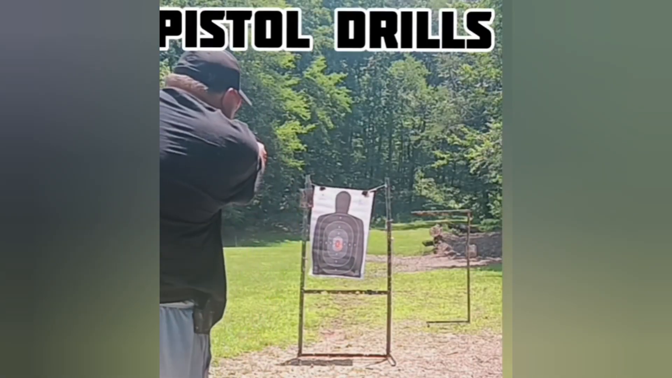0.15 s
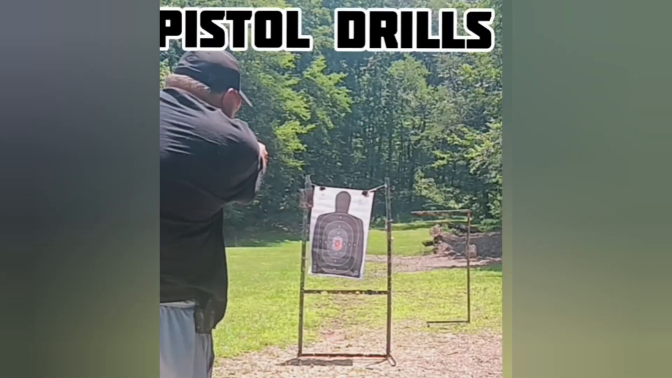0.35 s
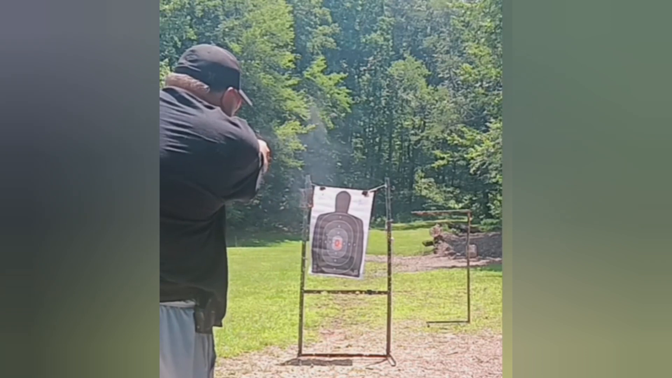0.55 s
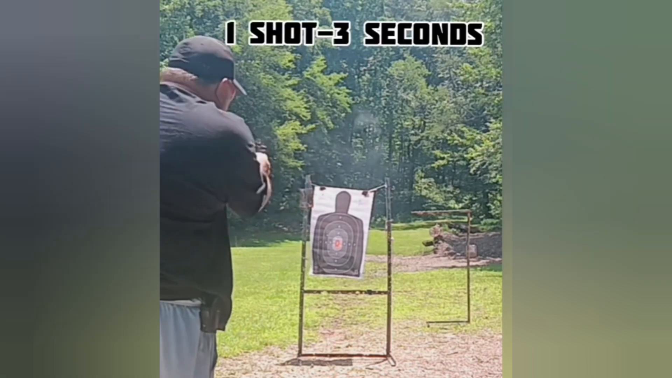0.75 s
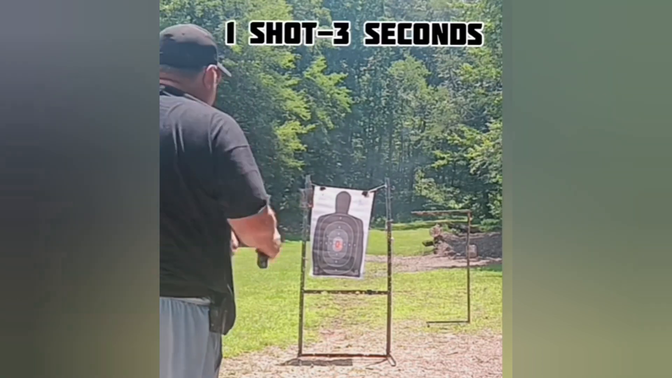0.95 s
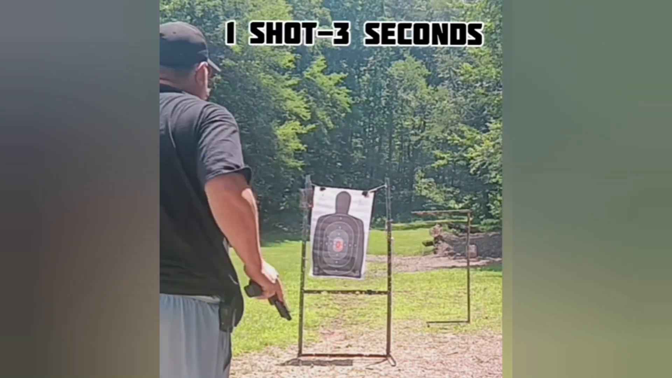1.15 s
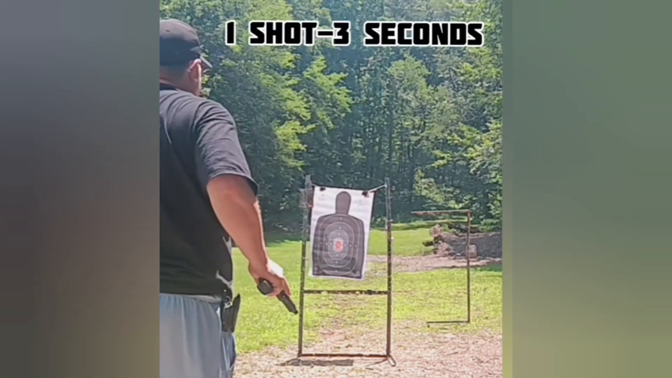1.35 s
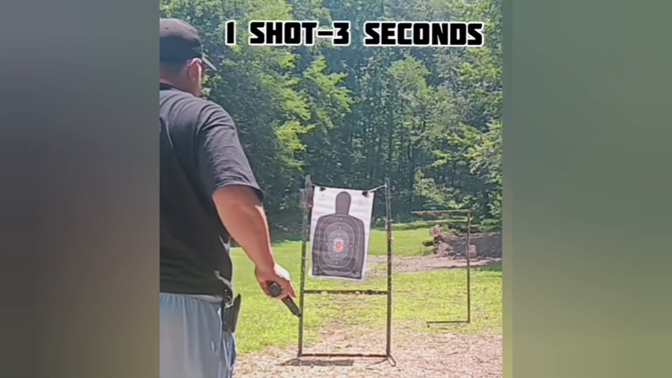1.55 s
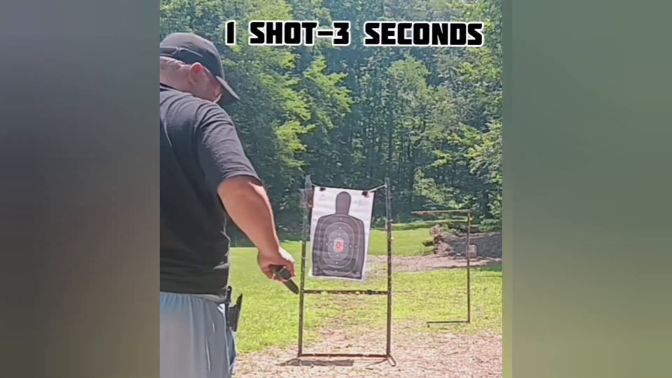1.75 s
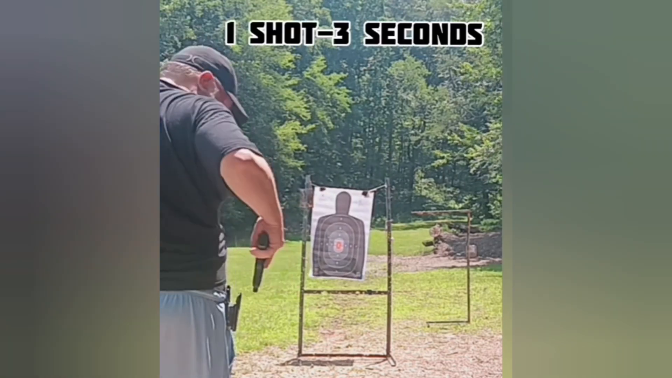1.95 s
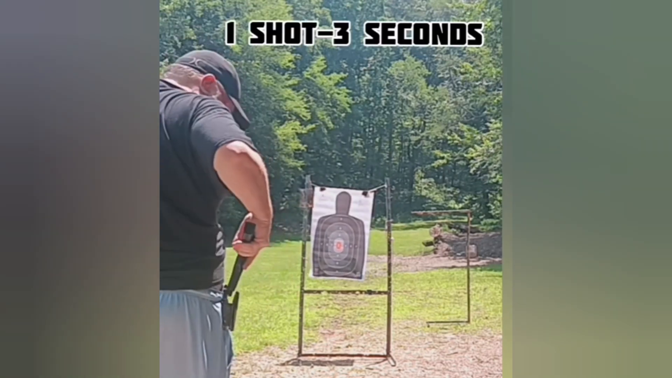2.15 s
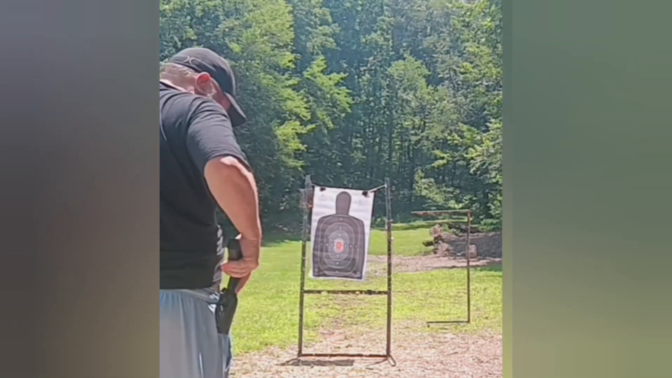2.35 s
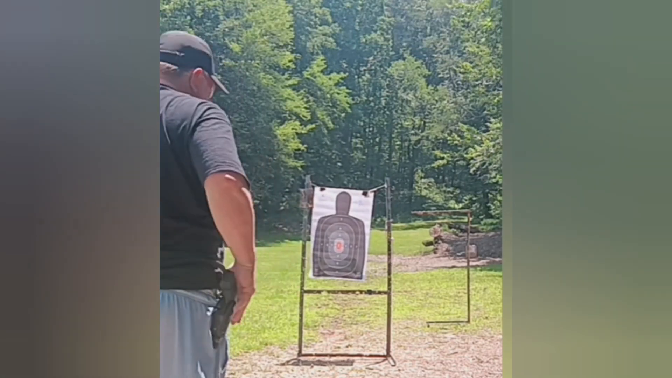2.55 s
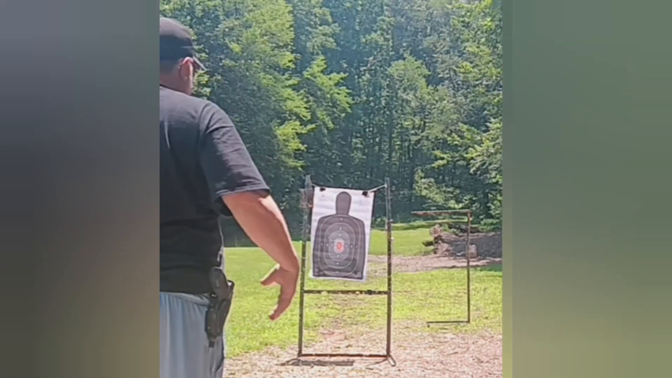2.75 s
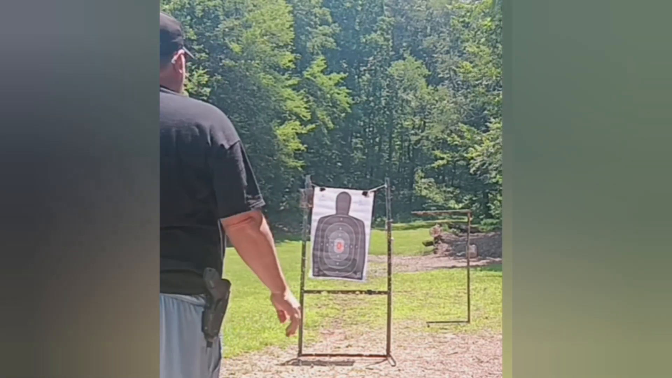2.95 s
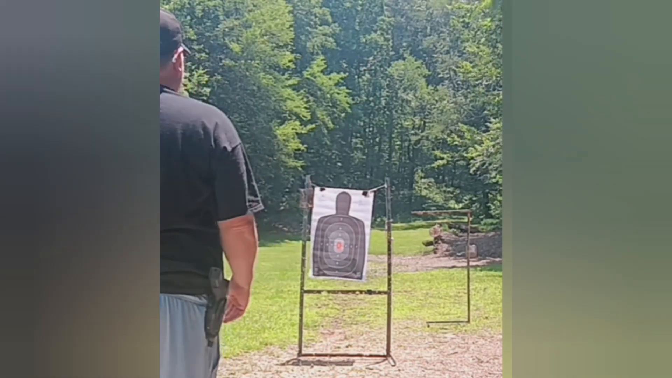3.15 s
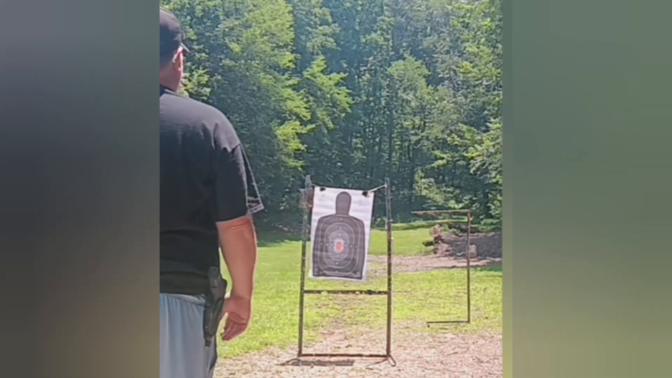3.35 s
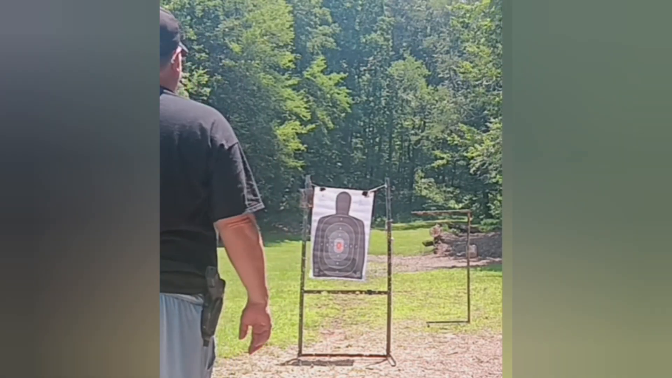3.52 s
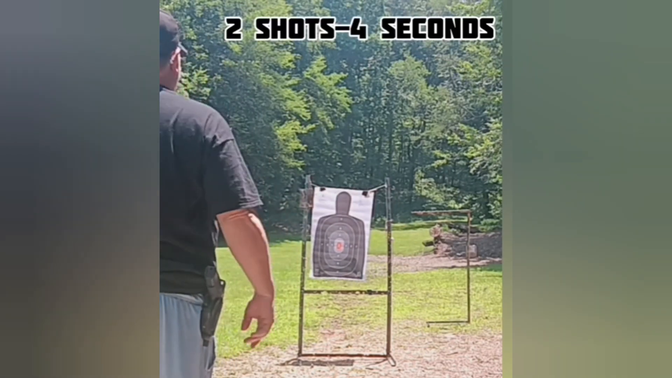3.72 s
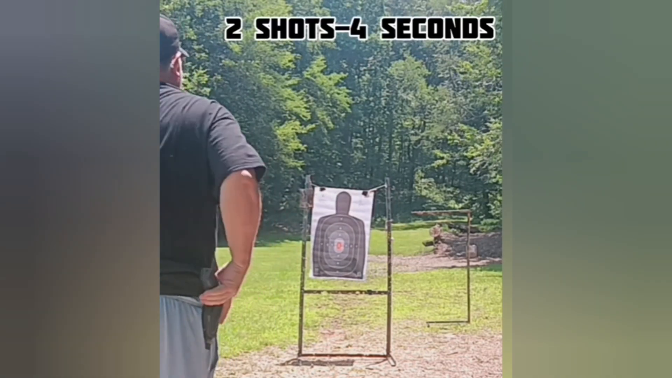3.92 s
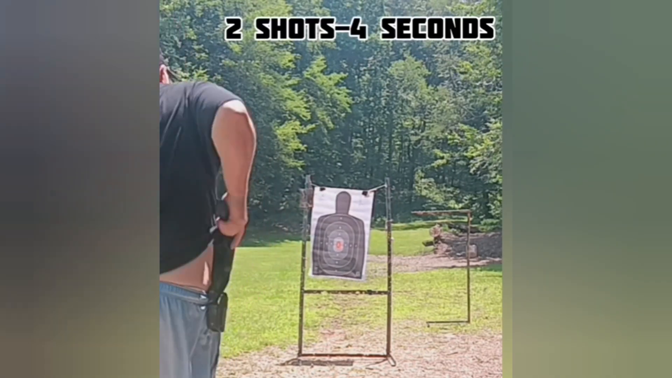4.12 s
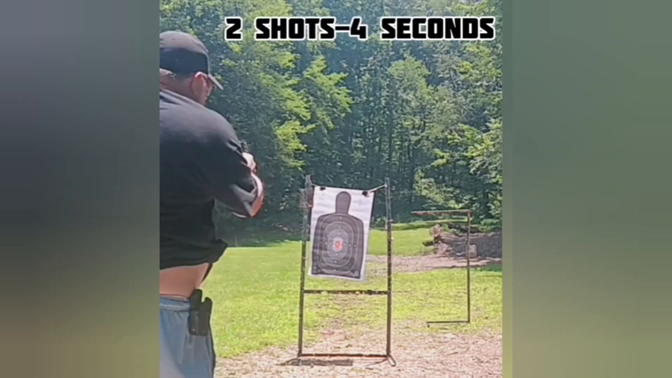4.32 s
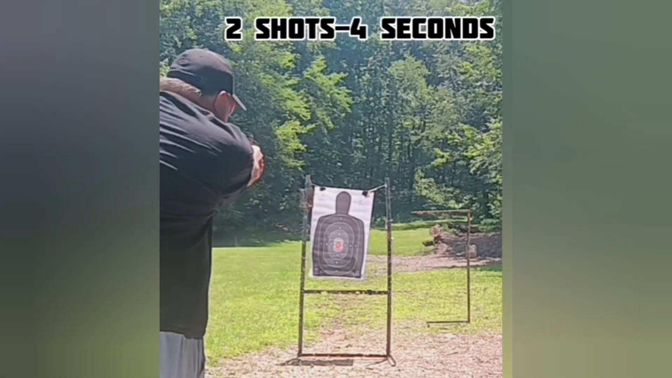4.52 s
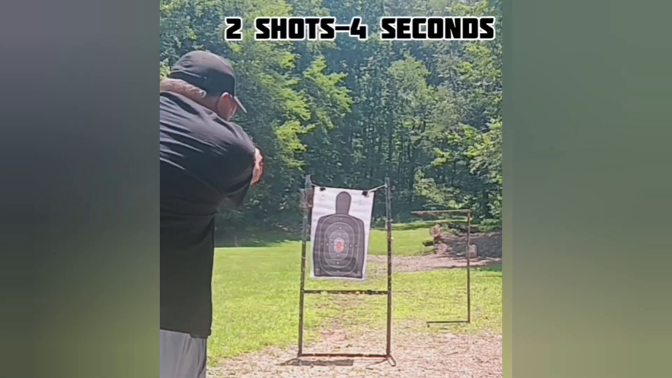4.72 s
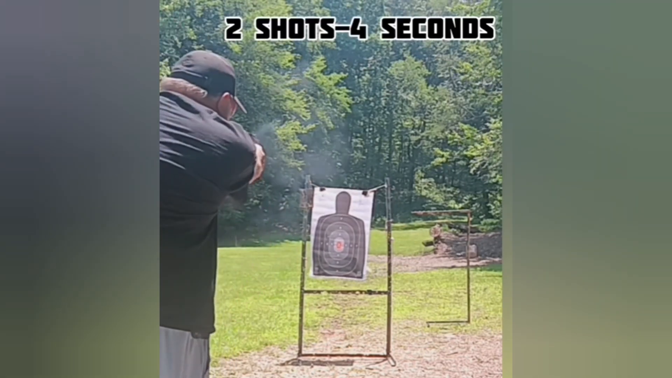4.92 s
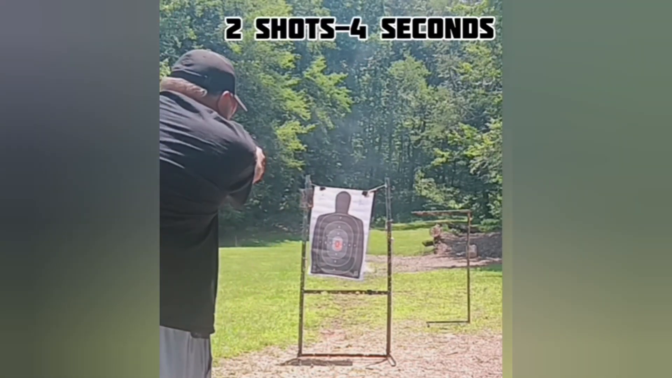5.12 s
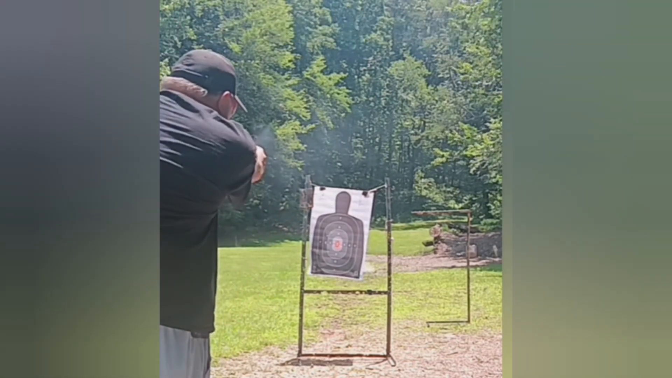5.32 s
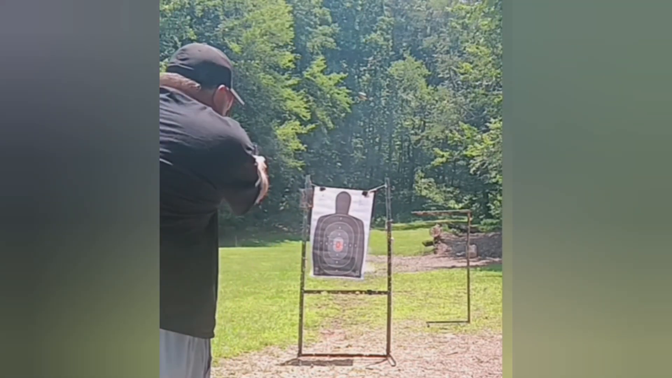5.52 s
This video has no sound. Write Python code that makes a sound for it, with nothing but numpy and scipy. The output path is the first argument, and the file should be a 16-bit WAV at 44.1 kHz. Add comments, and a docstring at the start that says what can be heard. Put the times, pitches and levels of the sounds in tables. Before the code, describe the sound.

Close phone recording outdoors: faint bird whistles, then one hard, flattened gunshot and a long forest echo losing treble. Under its tail comes a thin high brass ting, then scraping and a firm click as the pistol is holstered. Wind rumbles unevenly, strongest in the brighter right channel. Later the gun scrapes out, cloth brushes, small parts rattle, and two rapid shots end in fresh overlapping echo.

```python
"""Three pistol shots crack close by, overload a phone and roll back from a forest, ever duller, over a grass range.
Each blast is scattered noise, its echo noise losing treble with time, its booms short low pressure swings.
A spent case pings on the ground as decaying sines; a pistol scrapes into and out of a stiff holster as noise
ringing resonances; cloth and loose parts are bands of noise. Wind rumbles separately on two unlike microphones,
a bird whistles far off in gliding sines, and faint coloured noise is the air of the range."""
import sys
import numpy as np
from scipy import signal
from scipy.fft import rfft, irfft, next_fast_len
from scipy.io import wavfile

SR = 44100
rng = np.random.default_rng(int(sys.argv[2]) if len(sys.argv) > 2 else 0)


def master_out(mix):
    """Clip the mix to full scale and print it as 16-bit PCM to the path in sys.argv[1]."""
    frames = np.transpose(np.atleast_2d(mix))
    ceiling = np.clip(frames, -1, 1)
    pcm = np.round(ceiling * 32767).astype(np.int16)
    wavfile.write(sys.argv[1], SR, pcm)


N = 250047  # samples
T = np.arange(N) / SR  # seconds


def undb(db):
    """Logarithmic level: 20 dB is a tenfold amplitude."""
    return 10 ** (np.asarray(db) / 20)


def unit(x):
    """Normalisation: scale to an rms of 1 over all channels together."""
    return x / np.sqrt(np.mean(x ** 2))


def filtered(x, response):
    """Linear filtering: multiply the spectrum by a response given as a function of frequency."""
    size = next_fast_len(N + SR // 8, True)
    hz = np.arange(size // 2 + 1) * SR / size
    return irfft(rfft(x, size) * response(hz), size)[..., :N]


def colour(x, points):
    """Spectral shaping: a gain drawn through (Hz, dB) points on a logarithmic frequency axis."""
    hz, db = np.transpose(points)
    return filtered(x, lambda f: undb(np.interp(np.log(f + 1), np.log(hz), db)))


def delayed(x, s):
    """Travel time: every channel given arrives s seconds later."""
    samples = int(np.clip(round(s * SR), 0, N - 1))
    return np.pad(x, ((0, 0), (samples, 0)))[:, :N]


def noise():
    """Incoherence: white noise, unrelated left and right."""
    return rng.standard_normal((2, N))


def walk(rate):
    """Random modulation: straight lines between normal random values, rate of them a second."""
    return np.interp(T * rate, np.arange(N // 8), rng.standard_normal(N // 8))


def burst(s, decay_s):
    """Impulsive excitation: a sudden start and an exponential fall."""
    return (T >= s) * np.exp(-np.clip((T - s) / decay_s, 0, 50))


def swell(s, hz, length_s):
    """Wave packet: a sine pressure swing under a bell-shaped envelope centred on s."""
    bell = np.exp(-np.minimum(((T - s) / length_s) ** 2 / 2, 50))
    return bell * np.sin(2 * np.pi * hz * (s - T))


def envelope(start_s, hold_s, rise_db_per_s, fall_db_per_s):
    """Exponential growth and decay: a gain that rises to 1 at the start, holds and falls."""
    rise_db = -rise_db_per_s * np.maximum(start_s - T, 0)
    fall_db = -fall_db_per_s * np.maximum(T - start_s - hold_s, 0)
    return undb(rise_db + fall_db) + 1e-12


def surroundings(x, wet_db, t60):
    """Diffuse reverberation: sound scatters from the ground and nearby things in a decaying noise tail."""
    tail = noise() * burst(0, t60 / np.log(1000))
    tail /= np.sqrt(np.sum(tail ** 2, axis=1, keepdims=True))
    return x + undb(wet_db) * signal.fftconvolve(x, tail, axes=1)[:, :N]


AIR_DB = -71
# Spectrum of the still air. Each row: frequency in Hz, relative level in dB per Hz.
AIR = [(20, -3), (100, 3), (250, -5.5), (550, -9), (1500, -14.5), (3000, -13), (7000, -26), (16000, -27.5)]


def still_air():
    """Ambient noise: a steady coloured hiss whose level wanders slowly."""
    return unit(colour(noise(), AIR)) * undb(AIR_DB + walk(1.6))


# Spectrum of turbulence at the ports. Each row: frequency in Hz, relative level in dB per Hz.
WIND_COLOUR = [(15, -4.5), (45, -0.5), (85, -4), (140, -17), (250, -37), (600, -65.5), (2000, -100)]
# Light breeze, before flutter: relative level at the left port in dB, at the right port in dB.
BREEZE_DB = (-60, -57)
# Gusts. Each row: peak time in seconds, time to swell or fade by GUST_RANGE_DB in seconds,
# relative level at the left port in dB, at the right port in dB.
GUSTS = [(0.0, .04, -64, -33), (.11, .06, -62, -31.5), (.19, .1, -60, -37), (1.15, 0.2, -51, -35.5),
         (1.58, .11, -48.5, -27), (2.44, .25, -48, -46), (3.09, .1, -66, -47), (3.32, .08, -61, -44),
         (3.455, .085, -62, -26), (3.65, 0.09, -54.5, -30.5), (3.8, .12, -52, -48), (4.2, .14, -38, -35)]
GUST_RANGE_DB = 20
# Single buffets. Each row: centre time in seconds, frequency in Hz, level averaged over the ports in dB,
# length in seconds, left minus right level in dB.
BUFFETS = [(1.585, 75, -31, .016, -20), (3.435, 52, -32, .013, -16), (3.47, 100, -38, .012, -16),
           (3.7025, 180, -28, .002, -8), (3.7095, 75, -22.5, .006, -12), (4.183, 105, -36, .005, -6),
           (4.211, 90, -31, .004, -6)]


def wind():
    """Turbulent pressure: eddies rumble on each port separately, in a breeze, gusts and sharp buffets."""
    strength = undb(BREEZE_DB)[:, None]
    for s, length, left_db, right_db in GUSTS:
        slope = GUST_RANGE_DB / length
        gust = undb([[left_db], [right_db]]) * envelope(s, 0, slope, slope)
        strength = np.maximum(strength, gust)
    flutter = undb(2.4 * walk(25))
    out = unit(colour(noise(), WIND_COLOUR)) * strength * flutter
    for s, hz, db, length, pan_db in BUFFETS:
        port_db = db + np.array([[.5], [-.5]]) * pan_db
        out = out + undb(port_db) * swell(s, hz, length)
    return out


# Bird notes. Each row: start in seconds, length in seconds, start frequency in Hz, end frequency in Hz,
# peak level of the direct sound in dB.
BIRD = [(0.013, 0.15, 4540, 4430, -76), (0.061, 0.092, 2900, 3550, -74), (0.172, .1, 3860, 3686, -78),
        (4.379, 0.079, 3070, 2840, -79), (4.533, 0.067, 2840, 2420, -67.5), (4.583, 0.063, 3026, 2900, -75)]


def bird():
    """Frequency modulation: faint whistles glide and waver, then reverberate among the trees."""
    out = 0
    for s, length, start_hz, end_hz, db in BIRD:
        progress = np.clip((T - s) / length, 0, 1)
        glide_hz = start_hz + (end_hz - start_hz) * progress
        hz = glide_hz * (1 + .02 * walk(110))
        phase = 2 * np.pi * np.cumsum(hz) / SR
        out = out + undb(db) * np.sin(np.pi * progress) * np.sin(phase)
    return surroundings(np.array([out, out]), wet_db=1.5, t60=.5)


def scatter(grain_db, alike_hz):
    """Diffuse scattering: reflections of uneven strength; long waves reach both ports more alike."""
    common = rng.standard_normal(N)
    share = lambda f: .85 / (1 + (f / alike_hz) ** 2)
    alike = filtered(common, lambda f: np.sqrt(share(f)))
    unlike = filtered(noise(), lambda f: np.sqrt(1 - share(f)))
    return unit((alike + unlike) * undb(grain_db * walk(400)))


def absorb(x, db_per_s, power, thicken):
    """Absorption along the path: air and ever denser leaves take treble, bass slips between the trunks."""
    f, t, spectrum = signal.stft(x, SR, nperseg=512)
    khz = f[:, None] / 1000
    treble_loss = db_per_s * khz ** power * t * (1 + thicken * t)  # db_per_s holds at 1 kHz, early on
    bass_loss = 7 * t / (1 + (khz / .26) ** 4)
    return signal.istft(spectrum * undb(-treble_loss - bass_loss), SR, nperseg=512)[1][:, :N]


# Shots. Each row: start in seconds, then relative level of the blast in dB, of the echo in dB, of the booms in dB.
SHOTS = [(0.3405, 0, 0.5, -1.5), (4.7381, -0.5, -0.5, 2.5), (5.1666, 0, -2, 2)]
# Spectrum of the blast. Each row: frequency in Hz, relative level in dB per Hz.
BLAST = [(20, -20.5), (50, -6), (130, 0.5), (300, -0.5), (800, 1), (1300, -2.5), (2000, -3), (3500, -6.5),
         (7000, -14.5), (11000, -17.5), (16000, -21.5)]
# Spectrum of the forest's return before absorption. Each row: frequency in Hz, relative level in dB per Hz.
ECHO = [(20, -31), (60, -18), (125, -9), (260, -8.5), (450, -1), (750, 0), (1000, -3.5), (1500, -9),
        (2300, -10), (3500, -12.5), (6500, -13), (10000, -14), (16000, -19.5)]
# Booms thrown back by the bank and the edge of the wood. Each row: centre in seconds after the shot,
# frequency in Hz, relative level in dB, length in seconds.
BOOMS = [(0.035, 44.97, -19.5, .013), (.036, 200.9, -17, .005), (0.319, 120.3, -23.5, .009)]
# blast scattered by ground, shooter and target frames: it holds briefly, then dies fast
NEAR_DB, NEAR_HOLD_S, NEAR_FALL_DB_PER_S = -7, 0.065, 189.5
# the forest's return builds up, holds while the front crosses the trees, then fades with distance
ROLL_DB, ROLL_RISE_S, ROLL_RISE_DB_PER_S, ROLL_HOLD_S, ROLL_FALL_DB_PER_S = -15, 0.3, 30, 0.56, 14
# late on, the roll drops away over a short ramp (start in seconds after the shot)
ROLL_END_S, ROLL_DROP_S, ROLL_DROP_DB = 2.33, .11, 14


def gunfire():
    """Impulse and echo: every shot wakes the same reflectors, giving near blast, booms and forest roll."""
    ground = scatter(grain_db=1.5, alike_hz=584)
    trees = unit(colour(scatter(grain_db=1, alike_hz=450), ECHO))
    near = undb(NEAR_DB) * envelope(0, NEAR_HOLD_S, 0, NEAR_FALL_DB_PER_S)
    forest = envelope(ROLL_RISE_S, ROLL_HOLD_S, ROLL_RISE_DB_PER_S, ROLL_FALL_DB_PER_S)
    drop_db = ROLL_DROP_DB * np.clip((T - ROLL_END_S) / ROLL_DROP_S, 0, 1)
    dulled = absorb(trees, db_per_s=3.0, power=1.09, thicken=0.33)
    roll = dulled * forest * undb(ROLL_DB - drop_db + .8 * walk(25))
    booms = sum(undb(db) * swell(s, hz, length) for s, hz, db, length in BOOMS)
    out = 0
    for s, blast_db, echo_db, boom_db in SHOTS:
        # the muzzle gas churns differently each time
        blast = unit(colour(ground + 0.82 * noise(), BLAST)) * near * undb(0.86 * walk(120))
        shot = undb(blast_db) * blast + undb(echo_db) * roll + undb(boom_db) * booms
        out = out + delayed(shot, s)
    # the left channel trails the right by about a millisecond
    return np.vstack([delayed(out[:1], .0011), out[1:]])


# Small metal contacts, the landing case and a snap of the pistol. Each row: start in seconds,
# relative level of the click in dB, relative level of the ring in dB.
TICKS = [(1.039, -40, -60), (1.05, -37, -38), (1.317, -49, -78), (4.215, -39.5, -75), (4.217, -35, -79.5)]
# Modes of the brass case. Each row: frequency in Hz, relative level in dB, time to decay by 60 dB in seconds.
BRASS = [(10060, -5, 0.2), (10094, 1, 0.3), (10830, -15, 0.19)]


def metal():
    """Impact and modal ringing: a bright click and brief chatter at each contact, and thin ringing brass."""
    click_colour = [(500, -18), (3000, -13), (7500, -17.5), (9500, 7.0), (11500, 4.0), (16000, -3.5)]  # Hz, dB
    click = unit(colour(noise(), click_colour))
    out = 0
    for s, click_db, ring_db in TICKS:
        ring = 0
        for hz, db, t60 in BRASS:
            ring = ring + undb(db) * burst(s, t60 / np.log(1000)) * np.sin(2 * np.pi * hz * (T - s))
        contact = burst(s, 0.0017) + 0.233 * burst(s, .016)  # click, then chatter
        out = out + undb(click_db) * click * contact + undb(ring_db) * ring
    return out


def shell(x, modes, bare_db):
    """Resonance: contact noise rings the holster and partly radiates directly; so small a shell gives no bass."""
    ring = lambda f: sum(undb(db) * 1j * f * w / (hz ** 2 - f ** 2 + 1j * f * w) for hz, w, db in modes)
    sound = filtered(x, lambda f: ring(f) + undb(bare_db))
    return signal.sosfilt(signal.butter(4, 400, "high", fs=SR, output="sos"), sound)


# Pistol sliding in the holster, going in and coming out. Each row: start in seconds, time at the catch
# in seconds, relative level of the sliding in dB, relative level at the catch in dB.
STROKES = [(2.226, 2.366, -50.5, -30.5), (3.945, 4.03, -42, -30.5)]
# Holster resonances, one list going in and one coming out. Each row: frequency in Hz, width in Hz,
# relative level in dB.
HOLSTER = [
    [(829, 31, 18), (937, 73, 13), (1300, 190, 11.5), (1900, 190, 11.5), (2350, 290, 5.5), (3465, 380, -17),
     (9850, 830, -26)],
    [(620, 45, -2), (904, 110, 0), (1510, 294, 4), (2287, 82, 6.5), (3730, 580, -4.5), (6100, 900, -8.5),
     (9100, 1400, -45)],
]
# Catches and knocks of pistol on holster. Each row: start in seconds, relative level in dB.
CLICKS = [(2.243, -39), (2.276, -38), (2.29, -40), (2.309, -32), (2.317, -38), (2.3631, -26), (2.367, -24),
          (2.378, -26.5), (3.941, -33), (3.946, -31.5), (4.019, -26), (4.0253, -24.5), (4.03, -28),
          (4.038, -33)]
# Hollow pops as the pistol breaks loose and leaves the holster. Each row: start in seconds, frequency in Hz,
# relative level in dB, decay time in seconds.
POPS = [(3.941, 1000, -33, .005), (4.02, 600, -31, .017)]
# friction sets in quickly, peaks as the pistol forces the catch, and lets go
GRIP_DB_PER_S, CATCH_DB_PER_S, RELEASE_DB_PER_S = 1100, 650, 400


def holster():
    """Stick-slip friction: the pistol slides in tiny slips and knocks past the catch; the emptied shell pops."""
    slips = unit(noise() * undb(2.6 * walk(760) + 2.4 * walk(80)))
    out = 0
    for (start, catch, slide_db, catch_db), modes in zip(STROKES, HOLSTER):
        slide = undb(slide_db) * envelope(start, catch - start, GRIP_DB_PER_S, RELEASE_DB_PER_S)
        force = undb(catch_db) * envelope(catch, 0, CATCH_DB_PER_S, RELEASE_DB_PER_S)
        knocks = sum(undb(db) * burst(s, 0.0022) for s, db in CLICKS if abs(s - catch) < .5)
        contact = slips * np.maximum(slide, force) + noise() * knocks
        out = out + shell(contact, modes, bare_db=-7.5)
    pops = 0
    for s, hz, db, decay in POPS:
        pulse = burst(s, decay) - burst(s, 0.0028)  # the difference softens the onset
        pops = pops + undb(db) * pulse * np.sin(2 * np.pi * hz * (T - s))
    return undb(4.2) * out + pops


# Swishes of the shirt as the arm reaches and comes up. Each row: peak time in seconds, level in dB,
# centre frequency in Hz.
SWISHES = [(3.775, -69, 6200), (3.83, -69, 1900), (4.302, -58, 1550)]
SWISH_DB_PER_S = 420


def sleeve():
    """Friction noise: cloth brushing cloth gives a soft, narrow hiss that swells and fades."""
    out = 0
    for s, db, hz in SWISHES:
        band = [(.26 * hz, -35), (.58 * hz, -13), (hz, 1), (1.4 * hz, -14), (2.6 * hz, -15), (7.7 * hz, -37)]
        hiss = unit(colour(noise(), band))
        out = out + undb(db) * hiss * envelope(s, 0, SWISH_DB_PER_S, SWISH_DB_PER_S)
    return out


# The pistol rattles as the hands close on it: start in seconds, relative level in dB, decay time in seconds.
RATTLE = (4.2165, -54, .018)
# Spectrum of the rattle. Each row: frequency in Hz, relative level in dB per Hz.
RATTLE_COLOUR = [(400, -22), (1500, -10), (2400, -9), (3200, 0), (5000, -8), (12000, -20)]


def rattle():
    """Random impacts: loose parts of the pistol give a short mid-pitched clatter of uneven noise."""
    s, db, decay = RATTLE
    clatter = unit(colour(noise(), RATTLE_COLOUR))
    return undb(db) * clatter * burst(s, decay) * undb(3 * walk(300))


def scene():
    """Superposition: shots add to the small sounds of handling, wind, a bird and still air."""
    handling = surroundings(holster() + metal() + rattle() + sleeve(), wet_db=-16.0, t60=0.25)
    return gunfire() + handling + wind() + bird() + still_air()


# Microphone colour. Each row: frequency in Hz, gain of the left port in dB, gain of the right port in dB.
PORTS = [(50, -2.5, 1), (149.8, 2.5, -1.5), (500, 4.5, -2), (1298, 4.5, 0.5), (2350, 4.5, -2),
         (4400, 0.5, 1.5), (6500, -6.5, 6), (7980, -22, 3.5), (10006, -18.5, 13), (12000, -17, 4.5),
         (16000, -21, -3)]
TOP_HZ = 15900  # upper band limit


def record(dry):
    """Saturation: the ports, left dull and right bright, colour the sound; blasts flatten against full scale."""
    ports = np.array(PORTS)
    left = colour(dry[0], ports[:, [0, 1]])
    right = colour(dry[1], ports[:, [0, 2]])
    x = np.array([left, right])
    x = x / (1 + x ** 4) ** .25  # smooth overload
    x = signal.sosfilt(signal.ellip(8, .2, 70, TOP_HZ, fs=SR, output="sos"), x)
    return np.clip(x, -1, 1)


dry = scene()
out = record(dry)
master_out(out)
```